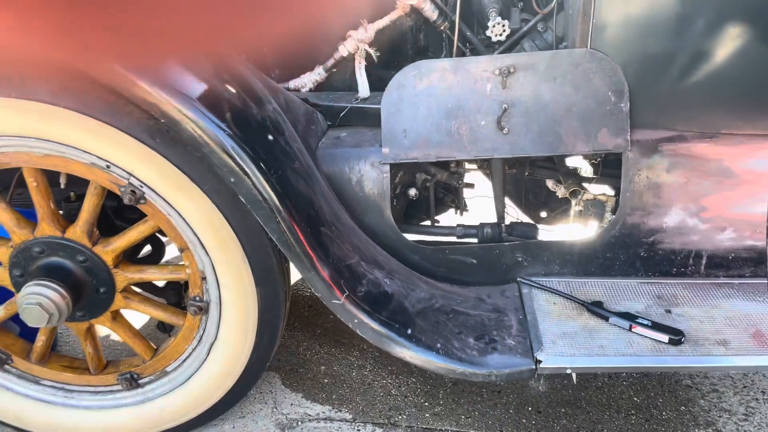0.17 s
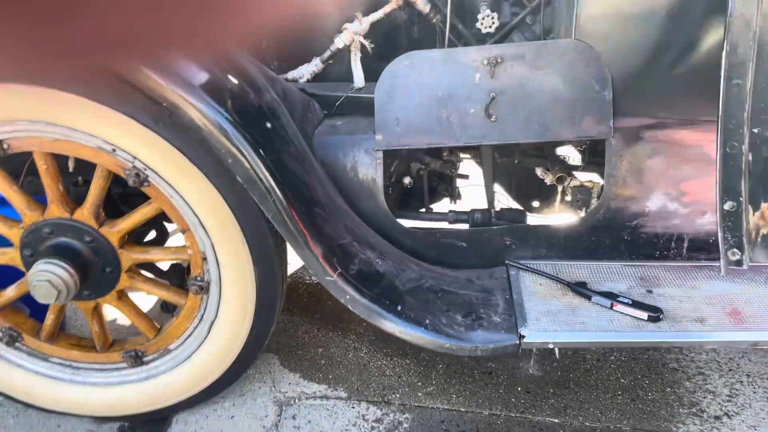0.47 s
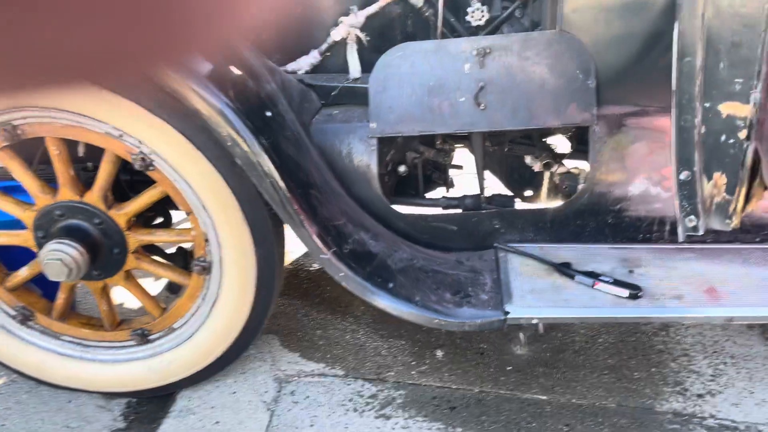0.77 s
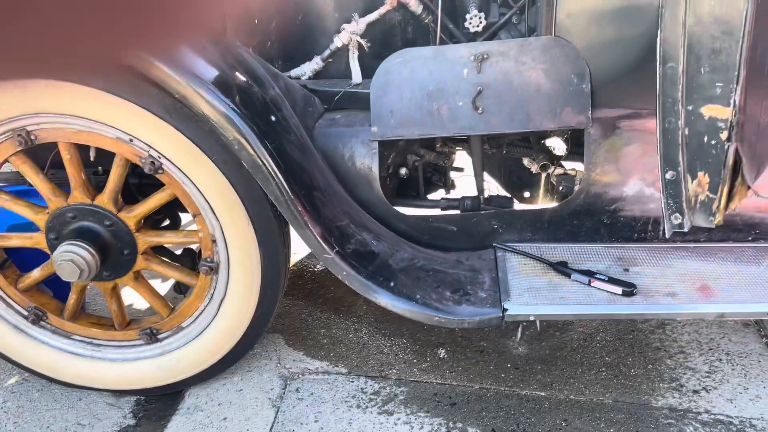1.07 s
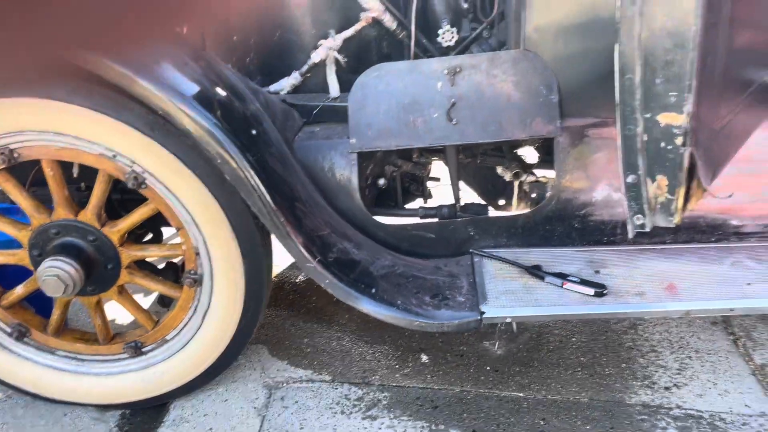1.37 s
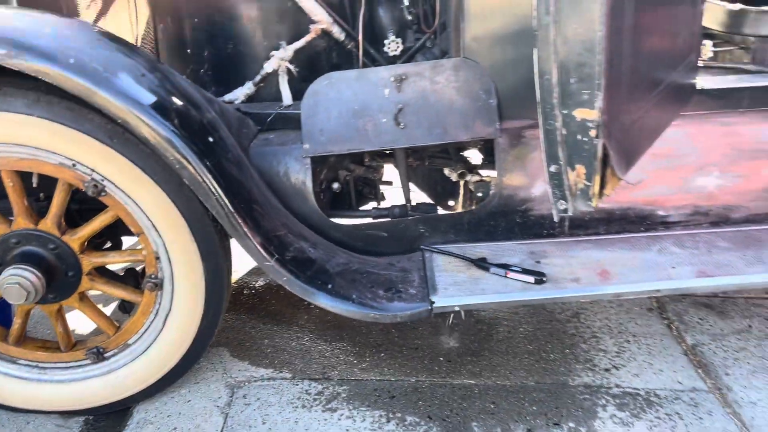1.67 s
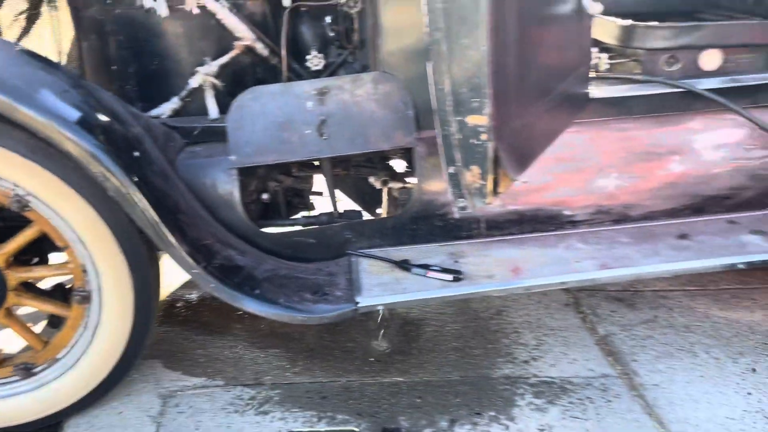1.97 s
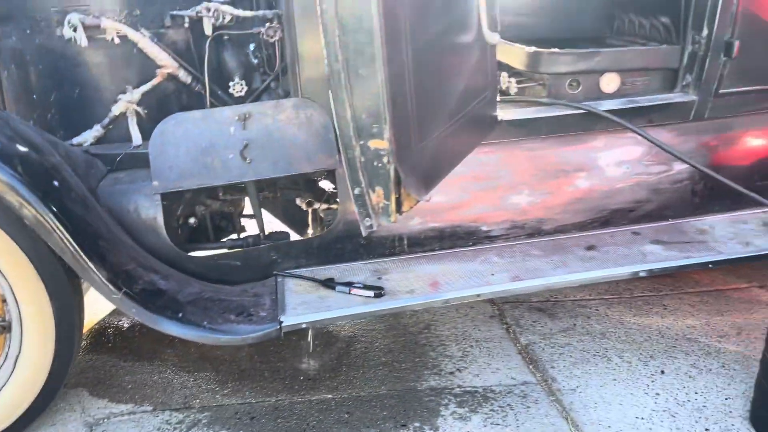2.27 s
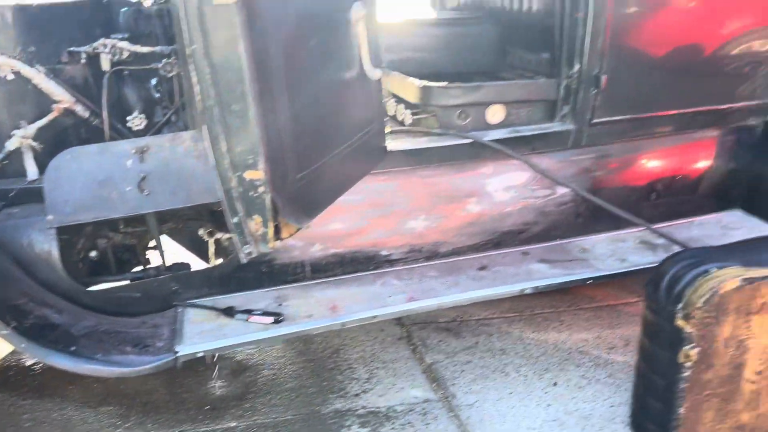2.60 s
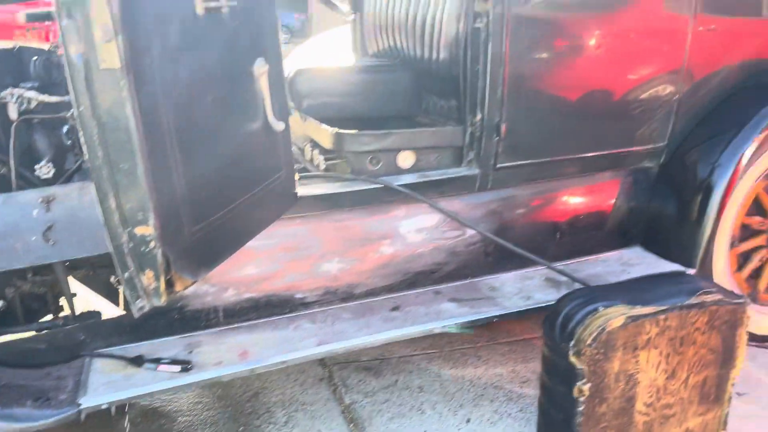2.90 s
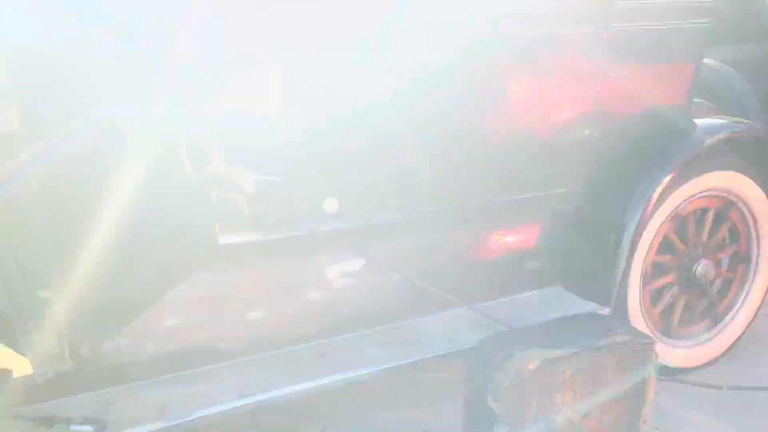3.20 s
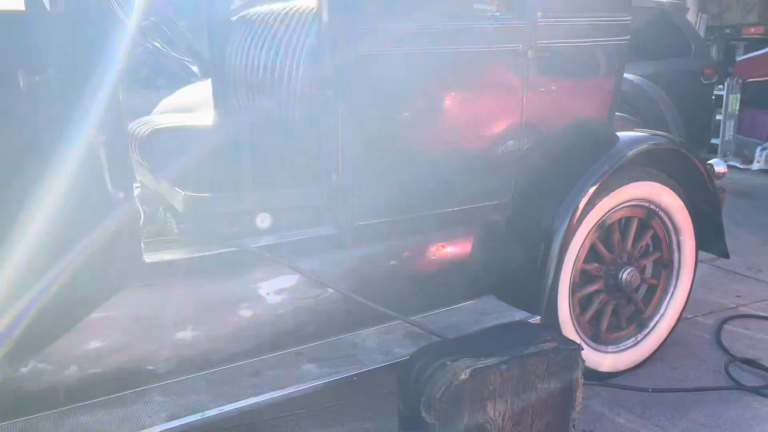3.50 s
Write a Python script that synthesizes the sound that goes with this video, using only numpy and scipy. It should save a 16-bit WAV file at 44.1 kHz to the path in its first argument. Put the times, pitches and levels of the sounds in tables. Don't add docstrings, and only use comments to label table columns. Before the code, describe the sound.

Continuous bright fuel hiss and airy tube tones from a vintage car's burner, close outdoors on a slowly turning stereo phone; low flutter swells into a louder puff late, then drops away.

```python
import sys
import numpy as np
from scipy import signal
from scipy.fft import rfft, irfft, next_fast_len
from scipy.io import wavfile
from scipy.ndimage import map_coordinates

SR = 44100
rng = np.random.default_rng(int(sys.argv[2]) if len(sys.argv) > 2 else 0)


def transcribe(u):
    v = np.clip(np.atleast_2d(u).T, -1, 1)
    q = np.round(v * 32767).astype(np.int16)
    wavfile.write(sys.argv[1], SR, q)


def level_to_linear(level):
    exponent = np.asarray(level, float) / 20
    return 10 ** exponent


N = 160965
M = next_fast_len(N)
HZ = np.maximum(np.arange(M // 2 + 1) * SR / M, 1)
T = np.arange(N) / SR


def at(table, col):
    rows = np.array(table, float)
    return np.interp(np.log(HZ), np.log(rows[:, 0]), rows[:, col])


def over(table):
    rows = np.array(table, float)
    return np.interp(T, rows[:, 0], rows[:, 1])


def white():
    return rfft(rng.standard_normal(M))


def unit(spec):
    x = irfft(spec, M)[:N]
    return x / np.sqrt(np.mean(x ** 2))


def walk(rate):
    return unit(white() / (1 + (HZ / rate) ** 2))


def pair(mid, side):
    return np.array([mid + side, mid - side])


def resonance(hz, width):
    return 1 / (1 + 1j * (HZ - hz) * 2 / width) ** 2


def held(x, steady):
    swing = abs(signal.hilbert(x.mean(axis=0), M)[:N])
    x = x / (swing + 0.37) ** np.clip(steady, 0, 1)
    return x / np.sqrt(np.mean(x ** 2))


def firebox():
    ring = resonance(hz=80, width=38)
    return pair(unit(ring * white()), level_to_linear(-17) * unit(ring * white())) * level_to_linear(-53)


# time in seconds, level in dB.
FLUTTER_LEVEL = [(0, -58), (.24, -50.5), (.31, -41), (.8, -44), (1.3, -44), (1.8, -40), (1.95, -43.5),
                 (2.28, -44.5), (2.42, -38.5), (2.5, -45), (2.7, -42), (2.8, -34), (2.95, -36.5),
                 (3.05, -44), (3.17, -34.5), (3.22, -46), (3.3, -61), (3.65, -67)]
# frequency in Hz, level in dB.
RUMBLE_COLOUR = [(12, -59), (20, -40), (52, -1.5), (75, -1.5), (102, -3.5), (140, -13.5), (186, -14.5),
                 (274, -31), (330, -14), (430, -29), (730, -120)]


def flutter():
    side_db, walk_db, steady = -16, 1.5, 0.23
    lead = 0.9
    shape = level_to_linear(at(RUMBLE_COLOUR, col=1)) / (1 + (30 / HZ) ** 4) / (1 + (HZ / 380) ** 6)
    shared = white()
    apart = 1j * lead * shared + np.sqrt(1 - lead ** 2) * white()
    both = pair(unit(shape * shared), level_to_linear(side_db) * unit(shape * apart))
    return held(both, steady) * level_to_linear(over(FLUTTER_LEVEL) + walk_db * walk(12))


# centre in seconds, length in seconds, pitch in Hz, level in dB.
PUFFS = [(0.333, 0.027, 85, -36), (0.494, 0.022, 74.5, -31), (0.556, .02, 75, -38), (0.635, .025, 80, -33),
         (0.704, .015, 80, -39), (.797, 0.018, 85, -27.5), (0.932, .025, 95, -39), (1.119, 0.019, 88, -37),
         (1.269, 0.034, 85, -33), (1.584, 0.023, 77, -31), (1.965, 0.018, 70, -30),
         (2.985, .025, 64.5, -32), (3.073, 0.03, 74.6, -37), (1.682, 0.013, 200, -41.5),
         (1.817, 0.01, 70, -24.5), (2.315, 0.0088, 113, -24.5), (2.317, 0.011, 219, -36),
         (2.326, .02, 65, -30), (2.392, .014, 110, -32), (2.406, 0.022, 59, -33), (2.796, 0.017, 80, -22.5),
         (2.843, 0.011, 123, -14.5), (2.855, 0.02, 250, -25), (2.863, 0.012, 430, -33.5),
         (2.86, 0.0098, 557, -39.5), (2.869, 0.0091, 136, -17.5), (2.886, 0.017, 94.5, -22.5),
         (2.925, 0.014, 196, -20.5), (2.926, 0.017, 286, -27), (2.941, 0.0066, 167, -22),
         (3.02, 0.029, 59.7, -32), (3.111, 0.023, 88.5, -28), (3.137, 0.0086, 81, -21),
         (3.166, 0.032, 61, -21.5)]


def buffets():
    grit_db, side_db, mic_low_hz = -23.5, -10, 35.4
    mid, side = np.zeros(N), np.zeros(N)
    grit = unit(white() / (1 + ((HZ - 320) / 200) ** 4))
    phases = rng.uniform(0, 2 * np.pi, (len(PUFFS), 2))
    for (s, length, hz, db), (p, q) in zip(PUFFS, phases):
        puff = level_to_linear(db) * np.exp(-((T - s) / length * 2) ** 2)
        angle = 2 * np.pi * hz * (T - s) + p
        side_angle = angle + np.pi / 2 + 0.09 * (q - np.pi)
        mid_grit = level_to_linear(grit_db) * grit * (hz / 150)
        side_grit = level_to_linear(grit_db) * np.roll(grit, 30) * (hz / 150) ** 2
        mid += puff * (np.cos(angle) + mid_grit)
        side += puff * level_to_linear(side_db) * (np.cos(side_angle) + side_grit)
    low_cut = signal.butter(2, mic_low_hz, "high", fs=SR, output="sos")
    return signal.sosfilt(low_cut, pair(mid, side))


# centre in seconds, pitch in Hz, ring in seconds, level in dB, left minus right in dB.
TAPS = [
    (.24445, 1200, .0009, -25, 0),
    (.24425, 2400, .0007, -24, 0),
    (3.07613, 1720, .0006, -11.7, -3),
    (3.0770, 950, .0010, -27, 0),
    (3.0759, 3600, .0004, -27, 6),
]


def ticks():
    lag_s = 0.00012
    t = T + lag_s / 2 * np.array([[1], [-1]])
    out = 0
    for s, hz, ring, db, pan_db in TAPS:
        level = level_to_linear(db + np.array([[pan_db], [-pan_db]]) / 2)
        out = out + level * np.exp(-((t - s) / ring) ** 2) * np.sin(-2 * np.pi * hz * (t - s))
    return out


# time in seconds, heading from 0 facing the burner to 1 turned away.
HEADING = [(0, 0.025), (.5, 0.062), (1.5, 0.097), (1.9, 0.29), (2.3, 0.54), (2.7, 0.73), (3.15, 0.86),
           (3.65, .99)]


def heading():
    return np.clip(over(HEADING), 0, 1)


# pitch in Hz, width in Hz, level in dB, left minus right in dB,
# side level in dB, dB gained by turning away.
TUBE_MODES = [(183.4, 55, -10.5, -1, -12, -4), (371.4, 59, -8, 1, -5.5, -2), (443, 63, -9, 2.5, -4.5, 1),
              (929, 99, 1, 3.5, -3, -1.5), (1328, 98, -5.5, 1, -16, -3.5), (1430, 59, -14, 6.5, -8, 8),
              (1812, 73, 0.5, -1, -15, 2.5), (2305, 310, -5, 2, 1, -4), (3785, 650, -4, -7, -21, -3.5)]
# time in seconds, level in dB.
TUBE_LEVEL = [(0.0, -45), (1.1, -45.5), (1.18, -46.5), (2.51, -46.5), (2.55, -48.5), (2.85, -46.5),
              (3.58, -49), (3.65, -44.5)]
# time in seconds, gain in dB.
WHISTLE_SWELL = [(0, -5), (.4, -6.5), (.55, -3), (.95, 1.5), (1.3, -3), (1.6, 4.5), (1.85, -3.5), (2.3, 2),
                 (2.75, 1.5), (3.0, -0.5), (3.65, 2.5)]


def tube():
    steady, whistle_steady = 0.21, 0.55
    beam_from_hz, beam_to_hz = 1600, 2000
    wander_s, lag_s = 0.00031, 0.00026
    turn = heading()
    out = 0
    for hz, width, db, pan_db, side_db, turned_db in TUBE_MODES:
        beams = beam_from_hz < hz < beam_to_hz
        ring = resonance(hz, width)
        both = pair(unit(ring * white()), level_to_linear(side_db - 8) * unit(ring * white()))
        both = held(both, whistle_steady if beams else steady * (width < 150))
        both = both * level_to_linear(np.array([[pan_db], [-pan_db]]) / 2)
        bent = T + (hz < beam_from_hz) * wander_s * walk(2.7)
        both = np.array([np.interp(bent, T, side) for side in both])
        level_db = db + turned_db * turn + beams * over(WHISTLE_SWELL) + 0.9 * walk(26)
        out = out + both * level_to_linear(level_db)
    late = map_coordinates(out[1], [(T - lag_s * turn) * SR], mode="mirror")
    return np.array([out[0], late]) * level_to_linear(over(TUBE_LEVEL))


# frequency in Hz, level in dB facing the burner, dB half
# turned, dB turned away.
HISS_COLOUR = [(250, -76, -77, -80), (584, -77.5, -78, -74.5), (1400, -71.5, -70, -77.5),
               (2090, -72, -77.5, -75.5), (2590, -75.5, -77.5, -72), (3960, -71, -72, -70),
               (5460, -71.5, -71, -69.5), (6140, -71, -69, -66),
               (7430, -65, -69, -66), (9300, -62, -66, -63.5), (10200, -65, -66, -73.5),
             (11160, -64.5, -62, -63), (12000, -67, -63, -64), (13300, -65, -69.5, -65.5),
             (14600, -66.5, -70, -73), (15720, -71, -78, -77)]
# frequency in Hz, phase spread in radians, share that leads, share leaning left.
PORTS_FACING_BURNER = [(200, 0.32, 0.17, 0.098), (900, 0.67, 0.039, 0.26), (1640, 1.43, 0.43, 0.41),
                       (1900, 0.2, .3, -0.22), (3000, 1.37, .6, 0.22), (4630, 1.24, .6, -0.095),
                       (5720, 2.12, .3, -0.48), (7170, 1.3, -.3, 0.39)]
PORTS_TURNED_AWAY = [(200, 1, 0.37, 0.24), (900, 1.55, .6, 0.45), (1710, 2.23, .4, .1),
                     (2460, 0.85, .2, 0.87), (3500, 1.6, .2, 1), (4500, 1.1, .3, 0.87),
                     (5630, 1.25, -0.6, 0.72), (7140, 1.77, -.5, 0.67)]
# frequency in Hz, spread facing in radians, spread turned in radians.
TREBLE_TWIST = [(7640, 2.67, 2.6), (7500, 2.21, 2.04), (8860, 3.17, 3.27), (9250, 2.84, 3.55),
                (9780, 2.25, 1.54), (11040, 1.66, 1.75), (12360, .6, .6), (13100, 0.3, .12)]
# time in seconds, share that escapes cancelling near the opposed frequency.
HAND_SHADE = [(0, -0.12), (.27, -0.11), (.4, 0.043), (1.1, 0.064), (1.5, -0.09), (2.1, -0.15),
              (2.72, -0.17), (2.8, -0.12), (3.1, -0.032), (3.3, -0.0043), (3.65, 0.074)]
# level in dB, delay in milliseconds facing, half turned, turned away.
PAVEMENT_ECHOES = [(-16, 1.4, 1.024, 0.97), (-14.5, 2.3, 2.3, 3.8), (-15.5, 3.9, 4.3, 5.5),
                   (-14.5, 7.7, 8.7, 7.4), (-13, 11.3, 12.9, 10.1), (-14, 17.9, 15.7, 13),
                   (-14.5, 26.1, 23.3, 21.7)]


def port_curves(low, col, opposed_hz):
    twist = [(row[0], row[col], np.sign(row[0] - opposed_hz), 0) for row in TREBLE_TWIST]
    rows = list(low) + twist
    return np.array([at(rows, col=1) / 2, at(rows, col=2), at(rows, col=3)])


def echo_response(col):
    copies = sum(level_to_linear(row[0]) * np.exp(-2j * np.pi * HZ * row[col] / 1000) for row in PAVEMENT_ECHOES)
    return 1 + copies / (1 + (HZ / 9000) ** 2)


def jet():
    level_db, flicker_db, low_hz, top_hz = 71.5, 0.69, 150, 15740
    opposed_hz, opposed_width_hz = 7600, 2400
    opposed = np.exp(-((HZ - opposed_hz) / opposed_width_hz) ** 2)
    facing = port_curves(PORTS_FACING_BURNER, 1, opposed_hz)
    turned = port_curves(PORTS_TURNED_AWAY, 2, opposed_hz)
    turn = heading()
    weights = [np.sqrt(np.clip(1 - abs(2 * turn - k), 0, 1)) for k in range(3)]
    heard, leak = [], 0
    for k, (half, lead, lean) in enumerate((facing, (facing + turned) / 2, turned)):
        a, b = white(), white()
        apart = np.sqrt(np.clip(1 - lead ** 2 - lean ** 2, 0, 1))
        colour = level_to_linear(at(HISS_COLOUR, col=1 + k) + level_db)
        gain = echo_response(1 + k) * colour * (HZ > low_hz) * (HZ < top_hz) * 0.025
        side = np.sin(half) * ((1j * lead + lean) * a + apart * b)
        heard.append(gain * np.array([np.cos(half) * a, side]))
        leak = leak + weights[k] * irfft(gain * opposed * a, M)[:N]
    out, place = 0, np.log2(HZ / 150) * 2
    for k in range(15):
        share = np.clip(1 - abs(place - k), 0, 1)
        band = sum(w * irfft(share * h, M)[:, :N] for w, h in zip(weights, heard))
        out = out + level_to_linear(flicker_db * walk(29)) * band
    return pair(out[0] + over(HAND_SHADE) * leak, out[1])


def scene():
    return firebox() + flutter() + buffets() + ticks() + tube() + jet()


def low_pass(x):
    return signal.sosfilt(signal.butter(12, 15730, fs=SR, output="sos"), x)


def record(dry):
    return low_pass(dry)


dry = scene()
out = record(dry)
transcribe(out)
```